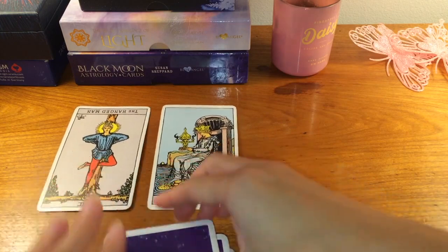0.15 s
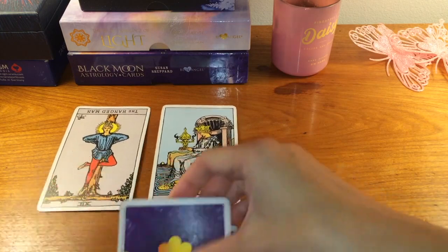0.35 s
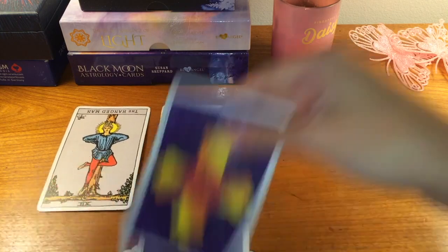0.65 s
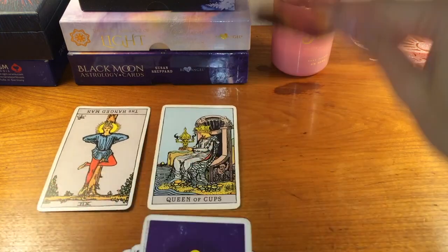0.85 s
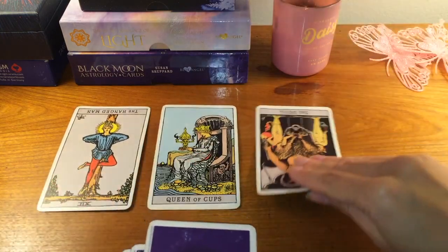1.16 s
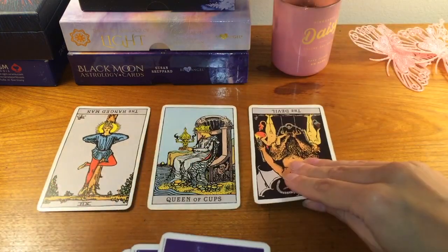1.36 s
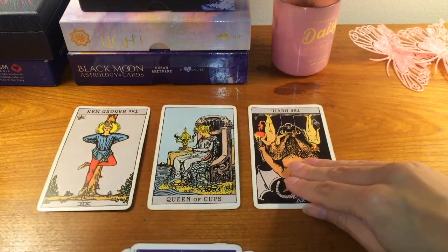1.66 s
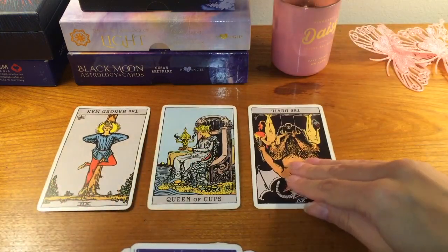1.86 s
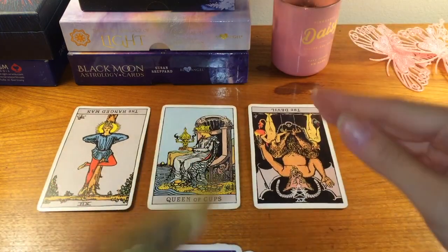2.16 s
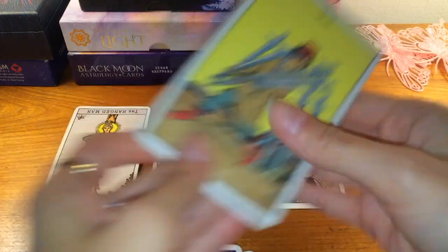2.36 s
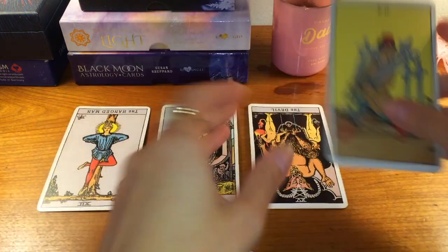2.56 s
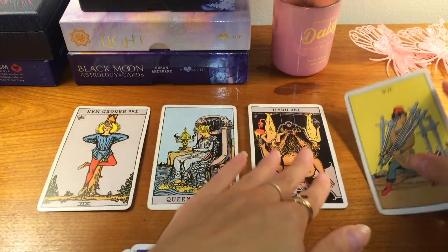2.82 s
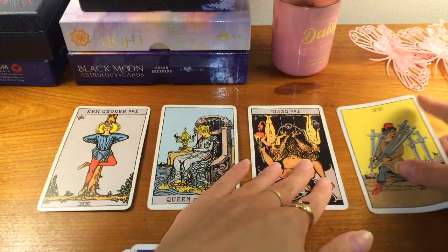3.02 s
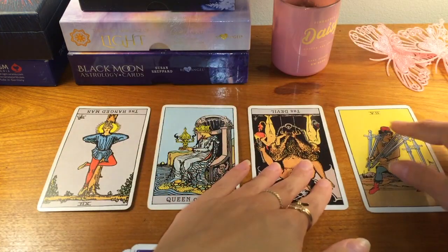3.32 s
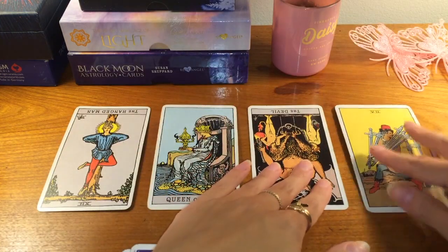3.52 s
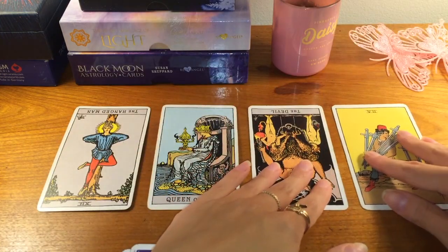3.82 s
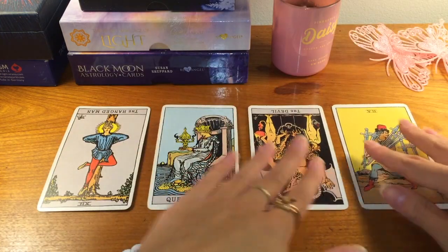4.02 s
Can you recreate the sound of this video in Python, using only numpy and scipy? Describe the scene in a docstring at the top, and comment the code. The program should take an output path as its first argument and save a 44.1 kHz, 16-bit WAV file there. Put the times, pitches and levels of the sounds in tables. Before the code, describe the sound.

A close, dry-sounding pickup in a small quiet room with a short, diffuse tail. A low wavering motor hum, soft rumble and faint hiss run throughout. At about 0.25 s an edge ticks crisply, then light card friction and tiny ticks lead to a brighter scrape and springy flick near 0.7 s as a card leaves the deck. At 1.0 s it lands: the loudest event, a sharp, bright, clustered slap with a short woody knock. Faint rubbing fades into near quiet until a rising hiss from 1.55 s ends in a crisp flick at 1.7 s. Soft sliding follows. From 2.4 to 2.65 s come light clicks, a small slap and papery shuffling, then softer taps at 2.73 and 2.93 s, the latter thin and bright. Sliding continues, with a snappy flick around 3.34 s, a fainter one at 3.45 s, and tiny ticks near 3.65 s. Only the room hum remains.

```python
"""A small quiet room with a wooden table: stiff glossy cards are drawn off a deck, turned and laid down.
Sliding cards hiss, made from grainy noise in narrow bands with one moving, favoured pitch.
Edges tick, faces slap and bent cards flick free: short noise sprays that ring the card and table.
A diffuse room tail follows; behind it a sine motor hum wavers over noise for rumble, drone and hiss."""
import sys
import numpy as np
from scipy import signal
from scipy.fft import rfft, irfft
from scipy.io import wavfile

SR = 44100
rng = np.random.default_rng(int(sys.argv[2]) if len(sys.argv) > 2 else 0)


def generate_wav(sig):
    """Save sig (samples, or channels by samples) to the path in sys.argv[1] as 16-bit PCM at SR."""
    pcm = np.round(np.clip(np.atleast_2d(sig).T, -1, 1) * 32767).astype(np.int16)
    wavfile.write(sys.argv[1], SR, pcm)


N = 184514  # length in samples

# Sliding friction over time, in stretches of points; close stretches run on as one hiss:
# time_s, level_db (before the shared cut in slides), gap_hz (resonance of the air gap),
# treble_db and low_db (shares before their shared lifts), height_db (of the resonance)
FRICTION = [
    [(0.27, -71, 2620, 1, 9, 9.0), (0.302, -73, 2660, -1, 4, 13), (0.334, -74, 2600, 3, 0, 9.0),
     (0.374, -70, 2460, 9, 3, 4), (0.39, -55.5, 2450, -6, -6.5, 7)],
    [(0.665, -51.5, 2890, -1, -9, 10), (0.691, -49.5, 2870, 0.5, -17, 3), (0.715, -37.5, 3000, 1, -20, 11)],
    [(1.5, -71, 2960, -3, -9, 6), (1.558, -62, 3100, -8.5, -8, 9.5), (1.58, -58, 3060, -9, -27, 10),
     (1.594, -58.5, 3170, -8, -15, 9.0), (1.64, -50, 3070, -11, -19, 12)],
    [(1.64, -51.5, 3100, -7, -15, 7.5), (1.674, -39.5, 3010, -8, -29, 3), (1.685, -42.5, 3060, -9, -12, 17)],
    [(2.76, -70, 2180, 3, 0, 11), (2.83, -71, 2367, 3, -2, 4), (2.876, -62.5, 2890, 2, -7, 3),
     (2.898, -69, 2970, 7, 9.5, 5), (2.91, -46.5, 2970, -11, -20, -1)],
    [(3.175, -59.5, 2750, -5, -12, 1.5), (3.253, -53.5, 2870, -10, -19, 7), (3.281, -59, 3120, -5, -4, 5),
     (3.301, -59, 3450, 4, -23, 6), (3.325, -53, 3440, 1, -15, 14)],
    [(0.41, -57.5, 4400, -4, -13, 10), (0.42, -64, 4380, -4, -12, 9), (0.446, -62, 4390, 3, -19, 8.0),
     (0.464, -54, 4400, 0, -13, 8.5), (0.538, -56.5, 4670, 0, -10, 2.5), (0.59, -50.5, 4600, 0, -11, 6)],
    [(0.6, -53.5, 3880, -2, -9, 13.5), (0.638, -53, 3940, -6, -17, 5), (0.65, -57, 3970, 0, -4, 9)],
    [(1.686, -42.5, 5300, -2, -13, 13), (1.7, -45.5, 5300, -3, -12, 19)],
    [(2.0, -76, 5210, 0, -3, 8.0), (2.038, -67.5, 5400, 6, -12, 10), (2.098, -57, 3920, 2, -12, 10.5),
     (2.166, -61, 4230, -2, -16, 0), (2.178, -62, 4420, 2, -10, 3), (2.2, -76, 4330, 7, 2, 8.0)],
    [(0.75, -64, 2960, 1, -11, 6), (0.774, -62, 3000, 1, -8, 1), (0.8, -64, 3160, 0, -11, 3.0)],
    [(0.83, -63, 2600, 2, -13, 7), (0.865, -64, 2730, 0, -12, -3)],
    [(0.88, -59, 4280, 4, -12, 0), (0.922, -53, 4190, -1, -23, 1), (0.926, -58, 4200, 0, -18, 1),
     (0.98, -65, 3053, -9, -7, 3.0)],
    [(1.17, -61, 2596, -8, -10, 0), (1.308, -71, 5880, 6, -10, 3.0), (1.334, -70, 5020, 5, -2, 3.0),
     (1.354, -70, 3683, -7, -14, 3.0), (1.36, -84, 3440, 9, 4, 3.0), (1.37, -76, 3240, -5, -7, 3.0)],
    [(1.73, -67, 5050, 9, -17, -13), (1.8, -80, 3910, -4, -8, 3.0), (1.85, -64, 3850, 4, -13, 3.0),
     (1.878, -74, 3580, 6, -6, 3.0), (1.986, -73, 4310, 4, -10, 6), (1.99, -81, 3940, 5, 0, 3.0)],
    [(2.2, -80, 4240, 11, -5, 3.0), (2.208, -71, 4130, 8, -2, 3.0), (2.246, -69, 4470, 11, -4, 1),
     (2.29, -66, 3760, 4, -10, 5), (2.33, -70, 3000, -1, -2, 1)],
    [(2.41, -48, 2700, -6, -3, -4), (2.416, -53, 2700, 2, 2, 3.0), (2.44, -61, 2700, 3, -6, 3.0)],
    [(2.455, -52, 2590, -3, 2, 5), (2.47, -67, 2590, 0, -4, -2)],
    [(2.49, -47, 3250, -6, 3, -1), (2.498, -55, 3270, 0, -7, 3.0), (2.51, -43, 3280, -10, 3, 9)],
    [(2.53, -72, 3350, 4, -18, -2), (2.56, -53.5, 3100, 3, 0, 0), (2.592, -65, 3040, 4, 0, -4),
     (2.632, -54, 2980, -4, -4.5, -3), (2.68, -77, 3020, 1, -14, 3.0)],
    [(2.95, -57, 4910, -8, -8, -2), (2.996, -76, 4110, -1, -8, 0), (3.038, -61, 3130, -3, -12, 1),
     (3.114, -58.5, 3350, -2, -22, -1), (3.15, -77, 3110, -9, 0, 3.0)],
    [(3.36, -74, 2930, -7, -2, -7), (3.384, -77, 3060, -11, 3, -5), (3.392, -79, 3150, -5, -13, 0),
     (3.42, -79, 3415, -4, -2, 3.0)],
    [(3.43, -65, 5000, 1, -4, 3.0), (3.444, -62, 5020, 9, -14, 3.0), (3.45, -68, 5020, 8, -19, 1)],
    [(3.5, -72, 2880, -2, 12, 3.0), (3.564, -82, 2750, -8, -8, 3.0), (3.63, -80, 4094, -4, 1, 3.0),
     (3.658, -67, 4410, -6, -22, 3.0), (3.672, -81, 4360, 5, 5, 3.0), (3.75, -88, 2760, -3, 4, -1)],
]
# What the card and the air under it ring with: pitch_hz, width_hz, level_db
CARD_RINGS = [(1353, 450, 8), (1830, 50, 6.5), (2850, 83, -9.5), (5370, 920, -2.5), (8290, 280, -16.5),
              (10700, 290, -10.5)]
# Ringing modes of the table top: pitch_hz, level_db, t60_s (time to fade by 60 dB)
TABLE_MODES = [(98.5, -0.5, 0.085), (125, -5, 0.21), (229.2, 3, 0.074), (318, 2, 0.094), (388, 0, 0.062),
               (450, -0.5, 0.12), (551, -5.5, 0.024)]
# Edges ticking on card or wood: peak_s, peak_db (before a shared cut), centre_hz,
# spread_octaves (each side), swell_t60_s, decay_t60_s, knock_db (push on the table,
# before a shared cut), tilt_db_per_octave (of that push)
EDGE_TICKS = [(.2556, -26.5, 4480, 1.15, 0.0014, .008, -73, 0.0),
              (.3953, -39, 3500, 2.1, .001, .008, -70, 2), (.4065, -43, 2500, 1.4, .001, .008, -72, 0.0),
              (.5958, -44, 3600, 0.69, 0.00093, 0.0091, -73, 0.0),
              (.646, -43, 1500, .6, .001, .01, -77, 0.0), (.6567, -33.5, 2000, 1.3, .001, 0.0099, -75, -2),
              (.8727, -38, 3487, 1.4, .001, 0.014, -68, -7),
              (2.171, -49, 2800, 0.99, .004, 0.035, -65, 0.0),
              (2.4481, -36, 2485, 1.7, .001, 0.0073, -52, 5),
              (2.4875, -30, 3000, 2.3, 0.00079, .01, -52, 3.0), (2.564, -44, 1500, 1.8, .01, 0.014, -56, 5),
              (2.635, -48, 1800, 1.5, .005, 0.012, -62, 1), (2.9185, -49, 4300, 0.71, .002, .008, -72, 0.0),
              (3.1665, -43, 2013, 1.8, 0.00076, .01, -70, 0.0),
              (3.4259, -46, 6000, 1.5, .001, 0.0092, -75, 0.0),
              (3.591, -52, 4500, 0.77, .001, .008, -80, 0.0), (3.642, -44, 4576, .6, 0.0012, .008, -80, -3),
              (3.657, -42.5, 5540, 0.68, .001, 0.0073, -72, 2)]
# Card faces landing: same columns
FACE_SLAPS = [(1.011, -8, 3350, 1.6, .001, 0.023, -28.5, 5.5),
              (1.0153, -15.5, 3500, 1.9, 0.0015, 0.0074, -31, 9),
              (1.0187, -11.5, 2370, 1.7, 0.0014, 0.025, -34.5, 5),
              (1.03, -19.5, 4000, 1.16, .002, .03, -62, -10),
              (1.0415, -25.5, 4930, 2.2, 0.0023, 0.042, -44, 9),
              (2.4031, -32.5, 3370, 1.25, 0.00089, 0.02, -53, 3.0),
              (2.731, -27, 1407, 1.17, .001, .02, -46.5, 1),
              (2.9271, -21, 9100, .8, 0.00087, 0.022, -39.5, -4.5)]
# A bent card flicking free, swelling up to the release: same columns
BENT_FLICKS = [(0.725, -28.5, 2970, 1.3, 0.031, .045, -67, 3),
               (0.741, -34, 10030, .8, 0.057, .02, -75, 0.0),
               (1.706, -29, 5400, 0.82, 0.025, 0.028, -40, -8),
               (2.479, -42.5, 1990, 2.8, 0.051, .04, -54, 3.0),
               (2.519, -41, 4100, 1.7, 0.079, .03, -60, 3.0),
               (3.339, -28, 3930, 1.15, 0.031, 0.032, -55, 16),
               (3.349, -40, 8000, 0.9, .02, 0.015, -70, -2),
               (3.456, -44, 11000, 0.7, 0.048, 0.022, -69, -6)]
# How long the room rings: pitch_hz, t60_s
ROOM_FADE = [(100, 0.067), (1000, 0.32), (4000, 0.33), (15000, 0.18)]
# Background levels and hum pitch over time: uneven fluctuations, with a brief drop near 2.3 s:
# time_s, hum_hz, hum_db, rumble_db, drone_db (before a shared lift)
BACKGROUND = [(0.0, 153.6, -50.5, -64, -61.5), (0.09, 158.8, -59, -64, -66.5),
              (0.53, 154.1, -54.5, -53, -63.5), (0.56, 158.5, -61, -58.5, -64.5),
              (0.66, 158.1, -55, -52.5, -63.5), (0.77, 155.1, -58, -58, -62.5),
              (1.26, 156.2, -54, -55.5, -63), (1.44, 157.4, -59.5, -56, -64.5),
              (1.47, 155.8, -51.5, -69, -66.5), (1.73, 155.5, -58.5, -66, -63),
              (2.08, 156.7, -56.5, -52.5, -66), (2.23, 154.6, -56, -62, -63.5),
              (2.25, 156.4, -73, -73, -66), (2.28, 149.5, -59, -64, -65), (2.32, 152.7, -81, -73, -66),
              (2.34, 152, -67, -63.5, -68.5), (2.53, 156.7, -51.5, -66, -64.5),
              (2.6, 156.7, -57, -52.5, -65.5), (2.81, 156.2, -55.5, -58, -65.5),
              (3.41, 153.8, -57, -55.5, -64), (3.42, 152, -58, -63, -61), (3.45, 151, -57, -56, -62.5),
              (3.49, 155.5, -61.5, -60.5, -66), (3.72, 155.4, -54.5, -58, -63),
              (4.04, 155.6, -54, -66, -66), (4.07, 154.7, -62, -69, -62.5), (4.12, 155.2, -49.5, -64, -65),
              (4.16, 157.1, -71, -56.5, -62), (4.18, 153.4, -65, -66, -67.5)]
# Colour of the house rumble: pitch_hz, level_db (per Hz, relative)
RUMBLE_COLOUR = [(15, -30), (25, -20), (33, -3), (41, 5), (48, 1), (60, -12.5), (75, -6.5), (100, -42.5)]
# Colour of the ventilation drone: pitch_hz, level_db (per Hz, relative)
DRONE_COLOUR = [(35, -46), (60, -23), (85, -8.5), (129, -3), (160, -7.5), (210, -8), (270, -15), (340, -16),
                (405, -14.5), (520, -22), (807, -24.5), (1300, -30.5), (1900, -37), (3300, -100)]
# Colour of the faint steady hiss: pitch_hz, level_db (per Hz, relative)
HISS_COLOUR = [(820, -27), (1400, -8), (2010, -8), (2160, -6.5), (14000, -16), (15500, -13)]

HISS_DB = -68
ROOM_DB, ROOM_DELAY_S = -15, 0.0063
CUTOFF_HZ = 15900  # from here up, everything is at least 60 dB down


def from_db(db):
    """Turn decibels into gain."""
    return 10 ** (np.asarray(db) / 20)


def rms_one(x):
    """Scale a sound to an average (rms) strength of 1."""
    return x / np.sqrt(np.mean(x ** 2) + 1e-20)


def in_time(rows):
    """Join the points of a table with straight lines; each column gets one value a sample."""
    time_s, *columns = np.transpose(rows)
    return [np.interp(np.arange(N) / SR, time_s, column) for column in columns]


def at_hz(points, hz):
    """Read a curve over pitch, with pitch spaced by octaves."""
    points = np.array(points)
    return np.interp(np.log(hz), np.log(points[:, 0]), points[:, 1], left=-120)


def drift(rate_hz):
    """Make a slow random wander of spread 1 by smoothing noise."""
    step = 40  # samples between the values that are drawn
    r = np.exp(-2 * np.pi * rate_hz * step / SR)
    noise = rng.standard_normal(N // step + 2002)
    slow = signal.lfilter([1], [1, -2 * r, r * r], noise)[2000:]  # drop the filter's start-up
    return np.interp(np.arange(N) / step, np.arange(len(slow)), rms_one(slow))


def band_pass(x, low_hz, high_hz):
    """Keep mainly the pitches between two limits."""
    sos = signal.butter(2, [low_hz, high_hz], "band", fs=SR, output="sos")
    return signal.sosfilt(sos, x)


def grit(size, spread_db):
    """Make dense friction noise whose grains are uneven in size."""
    noise = rng.standard_normal(size)
    grain_db = spread_db * np.minimum(rng.exponential(1, size), 4)
    return rms_one(noise * from_db(grain_db))


def friction_points(edge_s=0.011, lift_s=0.027):
    """Line up all stretches; the hiss dips only where the pause between two is long."""
    stretches, rows = sorted(FRICTION), []
    for stretch, following in zip(stretches, stretches[1:] + stretches[:1]):
        rows += stretch
        last, first = stretch[-1], following[0]
        if abs(first[0] - last[0]) > lift_s:
            rows.append((last[0] + edge_s, last[1] - 15, *last[2:]))
            rows.append((first[0] - edge_s, first[1] - 15, *first[2:]))
    return sorted(map(tuple, rows))


def slides(flicker_db=1.5, peak_octaves=0.2):
    """Friction noise in quarter-octave bands; the air gap under the card favours a moving pitch."""
    level_db, gap_hz, treble_db, low_db, height_db = in_time(friction_points())
    edges = 400 * 2 ** np.arange(0, 5.6, .25)
    noises = [grit(N, 1.3), grit(N, 1.3)]  # neighbouring bands take turns
    together = drift(22.5)  # flicker shared by all bands
    out = 0
    for k, (low, high) in enumerate(zip(edges, edges[1:])):
        hz = np.sqrt(low * high)
        band = rms_one(band_pass(noises[k % 2], low, high))
        # how far the band belongs to the treble or the lows, from 0 to 1
        to_treble, to_low = np.clip(np.log2([hz / 4500, 2100 / hz]), 0, 1)
        octaves_off = np.log2(hz / gap_hz)
        peak_db = height_db * np.exp(-.5 * (octaves_off / peak_octaves) ** 2)
        share_db = to_treble * (treble_db + 1.5) + to_low * (low_db + 3.5) + peak_db - 12.5
        out = out + band * from_db(level_db + share_db + flicker_db * (together + drift(17)))
    return out


def touches(before=2048, after=4096):
    """Each touch sprays short noise grains round its centre pitch and sets card and table ringing."""
    t = np.arange(-before, after) / SR  # seconds from the peak of the touch
    spray = np.zeros(N + before + after)
    knocks = np.zeros((len(TABLE_MODES), N))
    octave = np.log2(np.array(TABLE_MODES)[:, 0] / 250)
    for peak_s, peak_db, hz, octaves, swell, decay, knock_db, tilt_db in [
            *EDGE_TICKS, *FACE_SLAPS, *BENT_FLICKS]:
        t60 = np.where(t < 0, max(swell, 3e-4), max(decay, .002))
        shape = from_db(-60 * np.abs(t) / t60)
        low, high = np.clip(hz * 2 ** (max(octaves, .2) * np.array([-1, 1])), 200, 19000)
        raw = grit(len(t), 3.2)
        grains = rms_one(band_pass(raw, low, high))
        sharp_edge = signal.lfilter([1, -1], [1, -.85], raw)  # the sharp edge of the contact
        grains = grains + from_db(-5.0) * sharp_edge
        at = round(peak_s * SR)
        spray[at:at + len(t)] += from_db(peak_db - 8.0) * rms_one(grains) * shape
        uneven_db = rng.normal(0, 4.5, len(TABLE_MODES))
        knocks[:, at] = from_db(knock_db - 6.0 + tilt_db * octave + uneven_db)
    spray = spray[before:before + N]
    return card_ring(spray) + table_ring(knocks)


def card_ring(spray):
    """The spray itself, plus what rings in the card and the air under it."""
    rings = sum(from_db(db) * resonance(spray, hz, width_hz) for hz, width_hz, db in CARD_RINGS)
    return spray + rings


def resonance(x, hz, width_hz):
    """Ring at one pitch with a peak gain of 1; a narrow width rings longer."""
    r = np.exp(-np.pi * width_hz / SR)
    gain = (1 - r * r) / 2
    return signal.lfilter([gain, 0, -gain], [1, -2 * r * np.cos(2 * np.pi * hz / SR), r * r], x)


def table_ring(knocks):
    """Each knock starts the table's modes as fading sines, then their top is softened."""
    table = 0
    for k, (hz, db, t60) in enumerate(TABLE_MODES):
        r, w = from_db(-60 / (t60 * SR)), 2 * np.pi * hz / SR
        push = knocks[k] + 1e-18  # tiny offset keeps the filter off extremely small numbers
        mode = signal.lfilter([0, np.sin(w)], [1, -2 * r * np.cos(w), r * r], push)
        table = table + (-1) ** k * from_db(db) * mode  # neighbours start in opposite directions
    return signal.lfilter([.2], [1, -.8], table)


def room(x, length=16384):
    """Blurred echoes: after a short delay, a noise tail dies away at its own speed in each band."""
    t, edges = np.arange(length) / SR, 70 * 2 ** np.arange(0, 8.2, 1.0)
    tail = 0
    for low, high in zip(edges, edges[1:]):
        band = band_pass(rng.standard_normal(length), low, high)
        t60 = at_hz(ROOM_FADE, np.sqrt(low * high * 1.1))
        tail = tail + band * from_db(-60 * t / t60)
    tail = tail / np.sqrt(np.sum(tail ** 2))
    tail = np.r_[np.zeros(round(ROOM_DELAY_S * SR)), tail]
    return from_db(ROOM_DB) * signal.fftconvolve(x, tail)[:N]


def coloured(spectrum):
    """Shape steady noise to a given spectrum, at rms 1."""
    hz = np.maximum(np.fft.rfftfreq(N, 1 / SR), 1)
    return rms_one(irfft(rfft(rng.standard_normal(N)) * from_db(at_hz(spectrum, hz)), N))


def room_tone():
    """A wavering motor sine over house rumble, ventilation drone and faint hiss, all shaped noise."""
    hum_hz, hum_db, rumble_db, drone_db = in_time(BACKGROUND)
    sine = np.sin(2 * np.pi * np.cumsum(hum_hz) / SR)
    hum = np.sqrt(2) * from_db(hum_db + 0.5 * drift(3.9)) * sine  # root 2 brings the sine to rms 1
    rumble = from_db(rumble_db) * coloured(RUMBLE_COLOUR)
    drone = from_db(drone_db + 7.0 + 1.4 * drift(11.5)) * coloured(DRONE_COLOUR)
    hiss = from_db(HISS_DB + 0.24 * drift(5.5)) * coloured(HISS_COLOUR)
    return hum + rumble + drone + hiss


def scene():
    """Mix the cards, their room tail and the background into one channel."""
    rubs, hits = slides(), touches()
    tail = room(from_db(-5.5) * rubs + hits)  # the slides reach the room more weakly
    return (rubs + hits + tail + room_tone())[None]


def record(dry):
    """Cut the very top of the sound steeply."""
    return signal.sosfilt(signal.cheby2(16, 60, CUTOFF_HZ, fs=SR, output="sos"), dry)


dry = scene()
out = record(dry)
generate_wav(out)
```